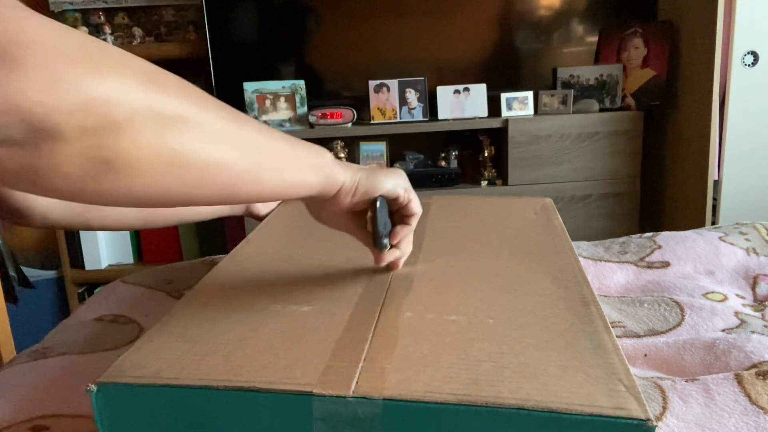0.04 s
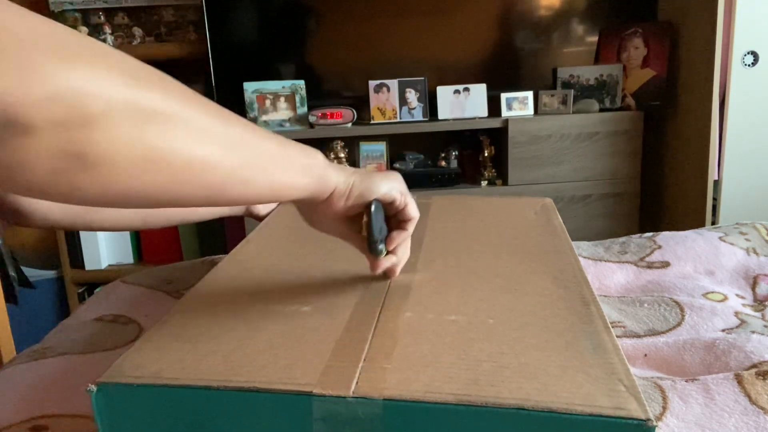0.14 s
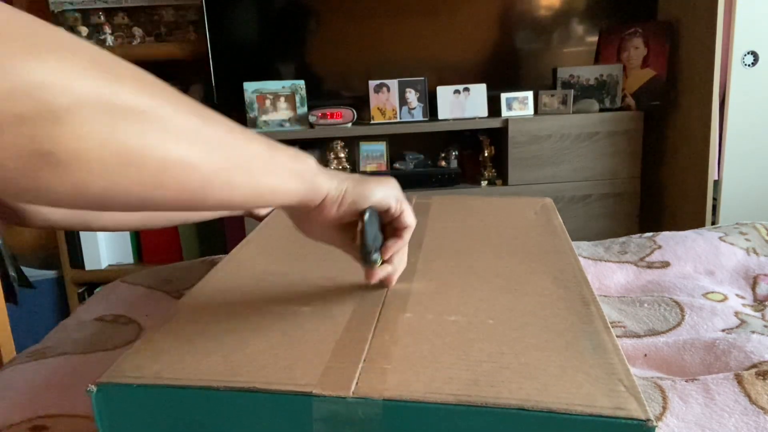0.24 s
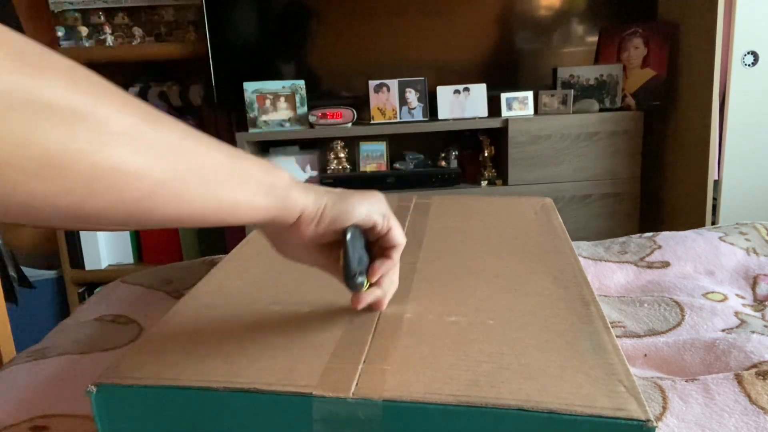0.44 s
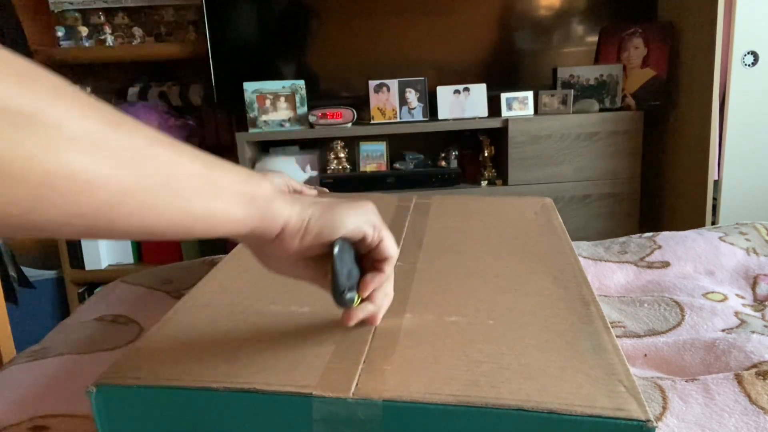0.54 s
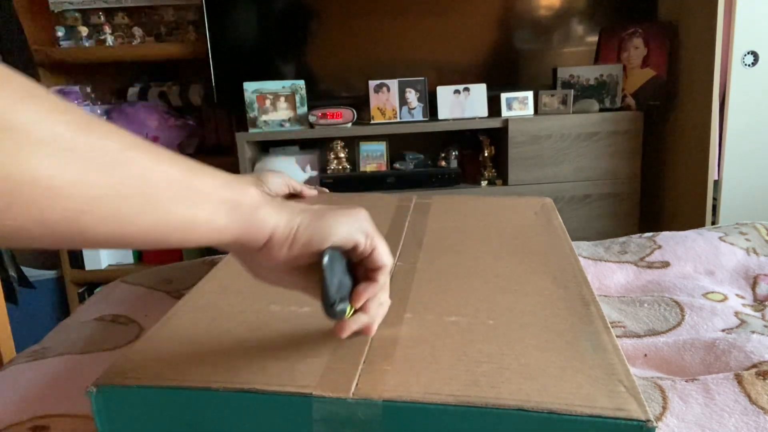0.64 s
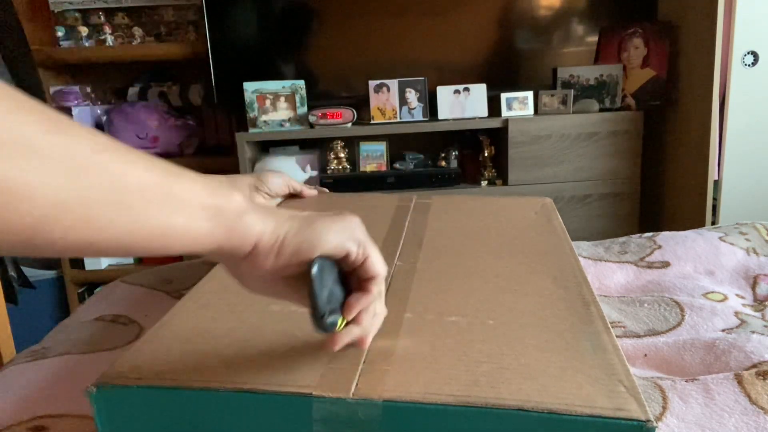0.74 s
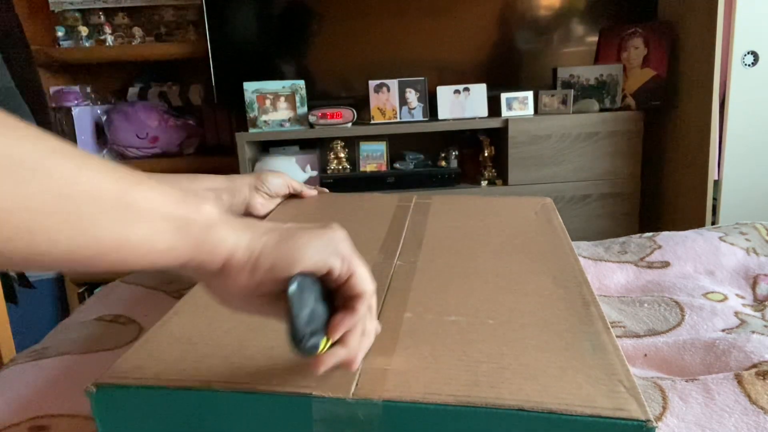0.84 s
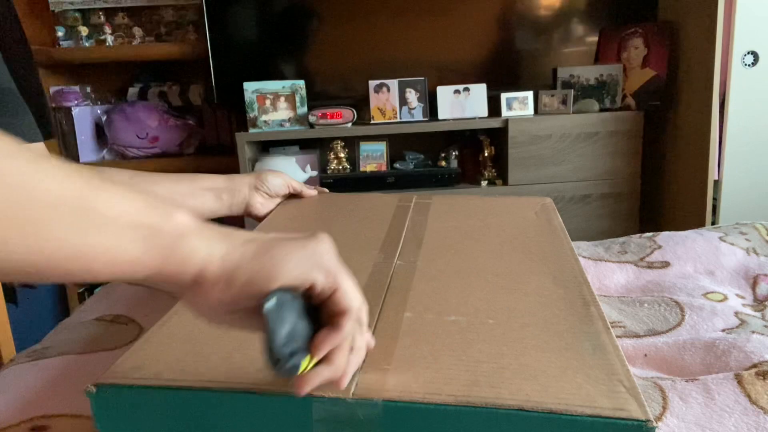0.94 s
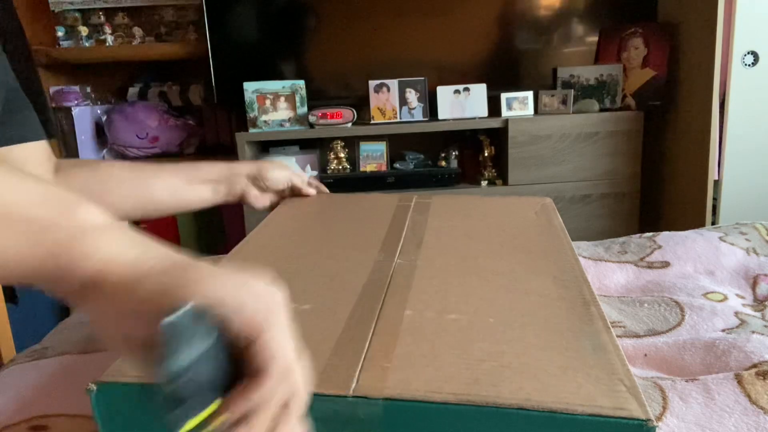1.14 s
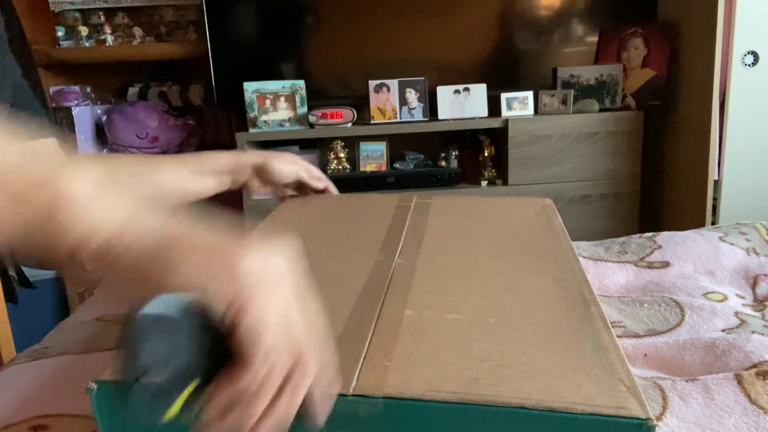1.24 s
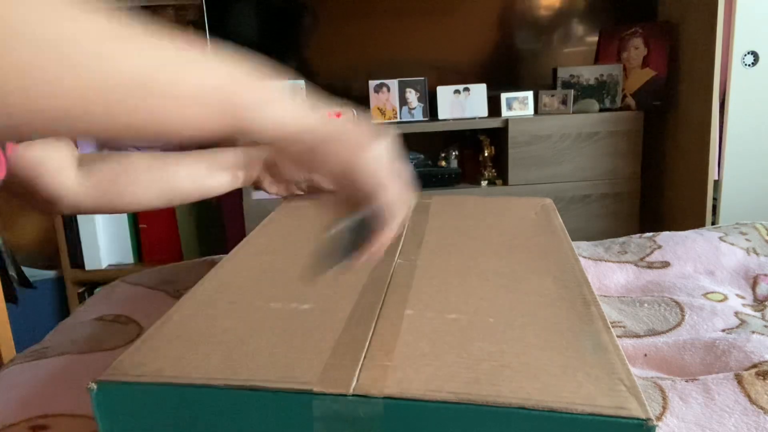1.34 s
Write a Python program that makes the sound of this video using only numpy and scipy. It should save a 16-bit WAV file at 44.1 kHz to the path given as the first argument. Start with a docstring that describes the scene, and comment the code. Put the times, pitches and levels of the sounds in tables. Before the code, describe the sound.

A box cutter drags along the taped seam of a hollow cardboard box, rasping and booming steadily, then rips out at the edge with a crisp click and soft thump, heard close in a small quiet room.

```python
"""In a small, quiet room, a box cutter is drawn towards the listener along a cardboard box's taped seam.
Tiny slips of the blade ring the lid's modes as a rasp and make the hollow box boom. Noise shaped by spectra
gives tearing fibres and the hiss of parting tape, brighter near the front edge; cutter rings swell in turn.
There the blade rips free and judders, the front flap knocks, the box thumps and the blade clicks in its
holder. A faint rustle swells after the cut, over still room air in stereo."""
import sys
import numpy as np
from scipy import signal
from scipy.fft import rfft, irfft, next_fast_len
from scipy.io import wavfile
from scipy.ndimage import uniform_filter1d, map_coordinates

SR = 44100
rng = np.random.default_rng(int(sys.argv[2]) if len(sys.argv) > 2 else 0)


def dump_mix(stems):
    """Bounce the given channels to the path in sys.argv[1] as a 16-bit WAV at rate SR."""
    frames = np.atleast_2d(stems).T  # one column per channel
    limited = np.clip(frames, -1, 1)  # hard clip at full scale
    pcm = np.round(limited * 32767).astype(np.int16)
    wavfile.write(sys.argv[1], SR, pcm)


N = 61739
T = np.arange(N) / SR
SIDES = np.array([[1], [-1]])  # opposite signs in left and right


def from_db(db):
    """Turn decibels into amplitude gain."""
    return 10 ** (np.asarray(db) / 20)


def rms_one(x):
    """Scale to rms 1."""
    return x / np.sqrt(np.mean(x ** 2) + 1e-20)


def in_time(rows):
    """Draw a two-column curve at every sample, with straight lines between its points."""
    s, values = np.transpose(rows)
    return np.interp(T, s, values)


def pan(db):
    """Left and right gains; a positive level difference favours the left."""
    return from_db(db * SIDES / 2)


def filtered(x, order, hz, kind="low"):
    """Apply a Butterworth filter."""
    return signal.sosfilt(signal.butter(order, hz, kind, fs=SR, output="sos"), x)


def ring(force, hz, t60):
    """A resonance driven by a force: a unit click starts a decaying sine of height about 1."""
    radius = from_db(-60 / (t60 * SR))
    w = 2 * np.pi * hz / SR
    return signal.lfilter([0, np.sin(w)], [1, -2 * radius * np.cos(w), radius ** 2], force + 1e-18)


def ring_modes(force, modes):
    """Ring a body's modes together with one force."""
    return sum(from_db(db) * ring(force, hz, t60) for hz, db, t60 in modes)


def push(s, length):
    """A smooth press and release of the board: one sine cycle of unit total size."""
    force = np.sin(2 * np.pi * np.clip((T - s) / length, 0, 1))
    return force / (np.abs(force).sum() + 1e-12)


def slips(per_s=2500, spread_db=3.0):
    """Friction as dense random slips of uneven size and either sign; rms 1."""
    sizes = from_db(spread_db * np.minimum(rng.exponential(1, N), 4))
    sizes = sizes * rng.choice([-1, 1], N)
    return rms_one(sizes * (rng.random(N) < per_s / SR))


def grit():
    """Slips mixed with smooth noise; rms 1."""
    return rms_one(slips() + rng.standard_normal(N))


def burst(s, db, attack, t60):
    """An envelope that rises quickly and dies away."""
    age = np.maximum(T - s, 0)
    return np.minimum(age / attack, 1) * from_db(db - 60 * age / t60)


def coloured(direct, spectrum, width):
    """Add diffuse sound at the sides to a central signal, then shape both by a spectrum; rms 1."""
    hz, db = np.transpose(spectrum)
    size = next_fast_len(N)
    bins_hz = np.arange(size // 2 + 1) * SR / size
    gain = from_db(np.interp(np.log(bins_hz + 1), np.log(hz), db))
    gain = gain * (1 - np.exp(-(bins_hz / (hz[0] / 2)) ** 2))  # fade out below the first point
    pair = direct + width * rng.standard_normal(N) * SIDES
    return rms_one(irfft(rfft(pair, size) * gain, size)[:, :N])


def room(x, wet_db):
    """The small room's reflections as a short decaying noise tail, different in each ear."""
    t60_s, delay_s, cut_hz = 0.19, 0.0015, 7600
    t = T[:N // 2]
    tail = rng.standard_normal((2, len(t))) * from_db(-60 * t / t60_s) * (t > delay_s)
    tail = filtered(tail, 2, cut_hz)
    tail /= np.sqrt(np.sum(tail ** 2, axis=1, keepdims=True) * SR / (2 * cut_hz))
    x = x * np.ones((2, 1))
    reflections = signal.fftconvolve(x.mean(axis=0)[None], tail, axes=1)[:, :N]
    return x + from_db(wet_db) * reflections


def steadied(x):
    """Even out the level over about 20 ms, so that the sound stays steady."""
    return x / np.sqrt(uniform_filter1d(np.mean(x * x, axis=0), size=900) + 1e-12)


# still air in the room: pitch_hz, relative level_db per Hz
AIR_SPECTRUM = [(30, -4), (65, 9.5), (130, -2), (400, -8.5), (1000, -1), (2000, -13.5), (5000, -34.5),
                (9000, -34), (13000, -27), (15500, -36)]


def room_air():
    """Wide, steady noise of the still room."""
    return from_db(-67.5) * coloured(rng.standard_normal(N), AIR_SPECTRUM, width=0.71)


# colour of the rustle: pitch_hz, relative level_db per Hz
RUSTLE_SPECTRUM = [(100, 3), (400, -7.5), (1000, -10.5), (4300, -3.5), (7000, -5), (9300, -16),
                   (12000, -3.5), (15000, -17)]
# rustle as the arm moves: time_s, level_db
RUSTLE_LEVEL = [(0, -74), (1.1, -62.5), (1.2, -59), (1.235, -69), (1.265, -69.5), (1.282, -57),
                (1.33, -62.5), (1.4, -72)]


def rustle():
    """Faint wide noise that swells as the arm moves after the cut."""
    noise = coloured(rng.standard_normal(N), RUSTLE_SPECTRUM, width=0.71)
    return from_db(in_time(RUSTLE_LEVEL)) * noise


# the blade catches and the rasp surges or stalls: peak_s, change_db
CATCHES = [(0.24, 3.5), (0.251, 4.5), (.268, -3), (0.2755, 7), (0.311, 3), (.363, -1.5), (0.608, 8.5),
           (.644, 4), (0.674, 6.5), (0.7, 3), (0.791, 3.5), (0.814, 1.5), (0.976, 6)]


def surges():
    """Swings of the drag in dB: marked catches over a small random unevenness."""
    catch_s, uneven_db, uneven_per_s = 0.0058, 1.5, 30
    knots = np.arange(0, T[-1] + 1, 1 / (2 * uneven_per_s))
    uneven = np.interp(T, knots, rng.standard_normal(len(knots)))
    catches = sum(db * np.exp(-((T - s) / catch_s) ** 2) for s, db in CATCHES)
    return uneven_db * uneven + catches


# rasp of the lid, before its trim and the surges: time_s, level_db
RASP_LEVEL = [(0, -55), (.13, -56), (.19, -57.5), (.232, -51), (.24, -41.5), (.33, -41.5), (.45, -41),
              (.59, -43.5), (.72, -42.5), (.77, -39), (.89, -38.5), (.97, -43), (1.01, -45.5), (1.05, -48),
              (1.066, -42), (1.09, -63), (1.11, -80), (1.2, -81.5)]
# pitch favoured by the blade's place on the lid: time_s, pitch_hz
LID_FOCUS = [(.1, 523), (.27, 567), (.4, 820), (.68, 745), (.8, 640), (.88, 527), (.97, 497), (1.05, 331)]
# modes of the lid: pitch_hz, relative level_db, t60_s
LID_MODES = [(290, -3, 0.12), (385.4, 2.5, 0.05), (440, -3, 0.031), (515, -5, 0.12), (583.6, -3.5, 0.086),
             (675, -5, 0.053), (756.4, -3, 0.082), (805.5, -5, 0.11), (892.5, -4, .12), (946, -2, 0.068),
             (1048, -4, 0.018), (1230, -7.5, 0.019), (1423, -9, 0.045)]


def lid_rasp(surge):
    """Slips ring the lid while the blade's place favours some of its modes."""
    trim_db, focus_db, focus_octaves = -0.5, 8, 0.41
    side_share = 0.3  # slips that differ between the ears
    focus_hz = in_time(LID_FOCUS)
    drag, rasp = slips(), 0
    for k, (hz, db, t60) in enumerate(LID_MODES):
        near = np.exp(-(np.log2(hz / focus_hz) / focus_octaves) ** 2)
        force = 0.5 * drag + slips() + side_share * slips() * SIDES
        mode = rms_one(ring(np.diff(force, prepend=0), hz, t60))
        rasp = rasp + from_db(db + focus_db * near) * mode * (-1) ** k
    rasp = filtered(rasp, 2, [220, 1700], "band")
    return from_db(in_time(RASP_LEVEL) + surge + trim_db) * steadied(rasp)


# soft blows on the cardboard: start_s, box_level_db, lid_level_db, contact_s
BUMPS = [(0.2114, -57, -49, 0.0011), (0.2207, -31.5, -68, 0.0068), (0.2283, -35.5, -63, 0.0059),
         (1.0805, -27.5, -59.5, 0.0084), (1.349, -75, -58, 0.0042), (1.383, -48.5, -65, 0.014)]


def lid(surge):
    """The lid rasps under the drag and knocks when soft blows press it, with the room around it."""
    blows = sum(from_db(db) * push(s, length) for s, _, db, length in BUMPS)
    knock = ring_modes(blows, LID_MODES)
    return room(lid_rasp(surge) + knock, wet_db=-9) * pan(-1.25)


# boom of the box, before its trim and the surges: time_s, level_db
BOOM_LEVEL = [(0, -49.5), (.12, -53), (.2, -56), (.25, -50), (.32, -46.5), (.43, -44), (.65, -43.5),
              (.71, -47.5), (.85, -46), (.98, -42), (1.05, -44.5), (1.1, -46.5), (1.15, -69), (1.22, -85)]
# modes of the whole box and its air: pitch_hz, relative level_db, t60_s
BOX_MODES = [(65, -6.5, 0.11), (107, -4, 0.13), (155.4, -4, .07), (185.5, 0, 0.054), (239, -6.5, 0.025)]


def box(surge):
    """Slips make the hollow box boom, and the same soft blows as on the lid make it thump."""
    trim_db, boom = -1, 0
    for hz, db, t60 in BOX_MODES:
        boom = boom + from_db(db) * rms_one(ring(np.diff(slips(), prepend=0), hz, t60))
    boom = steadied(filtered(boom, 2, 320)[None])
    boom = from_db(in_time(BOOM_LEVEL) + surge + trim_db) * boom
    blows = sum(from_db(db) * push(s, length) for s, db, _, length in BUMPS)
    thump = ring_modes(blows, BOX_MODES)
    return room(boom - thump, wet_db=-16) * pan(1.2)


# narrow rings of the cutter: pitch_hz, relative level_db, t60_s, strongest_s
CUTTER_RINGS = [(2098, 7, 0.15, 0.35), (2274, 0, 0.087, 0.76), (2685, 6, 0.033, .52),
                (3080, -1, 0.096, 0.61), (3620, 4, .08, 0.83)]


def cutter_rings():
    """Slips ring the dragged cutter, whose narrow tones swell in turn; rms 1."""
    swell_db, swell_s = 4.5, 0.09
    rings = 0
    for hz, db, t60, s in CUTTER_RINGS:
        swell = swell_db * np.exp(-((T - s) / swell_s) ** 2)
        rings = rings + from_db(db + swell) * rms_one(ring(slips(), hz, t60))
    return rms_one(rings)


# tearing fibres, before their trim and the surges: time_s, level_db
TEAR_LEVEL = [(0, -67), (.12, -59), (.19, -63.5), (.228, -59.5), (.245, -52.5), (.28, -53), (.4, -46),
              (.46, -50.5), (.56, -52.5), (.63, -54.5), (.8, -52.5), (.97, -47), (1.0, -57), (1.04, -57),
              (1.07, -46.5), (1.12, -60.5), (1.2, -94)]
# colour of the tearing: pitch_hz, relative level_db per Hz
TEAR_SPECTRUM = [(900, -5.5), (1300, 1), (1700, -0.5), (2150, -4), (2700, -4.5), (3500, -12.5), (5000, -44)]


def tearing(surge):
    """Fibres give way as sparser slips, mixed with the cutter's rings; both follow the drag a little."""
    trim_db, rings_db, follow = -1, -6.5, 0.21
    fibres = coloured(slips(per_s=900, spread_db=1.5), TEAR_SPECTRUM, width=0.51)
    level = from_db(in_time(TEAR_LEVEL) + follow * surge + trim_db)
    return level * (fibres + from_db(rings_db) * cutter_rings())


# hiss of the parting tape, before its trim: time_s, level_db
HISS_LEVEL = [(0, -64), (.19, -64), (.24, -57.5), (.55, -60), (.8, -59), (.88, -52.5), (.97, -46.5),
              (1.0, -51.5), (1.05, -49), (1.08, -57.5), (1.18, -64), (1.23, -85)]
# colour of the tape's film: pitch_hz, relative level_db per Hz
FILM_SPECTRUM = [(2000, -8), (3200, -2), (4400, 0), (6200, 1), (8000, 2), (9300, -37.5), (10500, 0.5),
                 (11800, -4), (13500, -3.5), (14800, -35)]


def tape_hiss():
    """The parting film hisses as slips and noise in the treble."""
    trim_db = 3.5
    return from_db(in_time(HISS_LEVEL) + trim_db) * coloured(grit(), FILM_SPECTRUM, width=0.67)


# scratches through the film, as the blade bites and before it rips free: start_s, level_db, attack_s, t60_s
SCRATCHES = [(.098, -55.5, .004, 0.16), (.211, -53, .002, 0.049), (.224, -47, 0.0088, .12),
             (1.0505, -42, 0.0035, 0.057)]


def scratches():
    """The blade scratches the film in short bursts of coarse grains."""
    grains = coloured(slips(per_s=640), FILM_SPECTRUM, width=0.51)
    return sum(burst(*row) for row in SCRATCHES) * grains


def tape(surge):
    """Tearing, hiss and scratches share the place of the tape."""
    return (tearing(surge) + tape_hiss() + scratches()) * pan(0.5)


# the blade clicks and chatters in its holder: start_s, level_db
CLICKS = [(1.0909, -12.5), (1.0944, -28), (1.0990, -34)]
FIRST_CLICK_S, CLICK_CONTACT_S = CLICKS[0][0], 0.00042
# colour of the rip: pitch_hz, relative level_db per Hz
RIP_SPECTRUM = [(700, -12), (1500, -2), (2400, -10.5), (3500, 2.5), (4900, 1.5), (6000, 7.5), (7200, -1),
                (9300, -9), (11500, -2.5), (15000, -14)]


def rip():
    """Gritty noise bursts as the blade rips through the edge, then a crack around the first click."""
    ripping = burst(1.056, db=-25, attack=0.0029, t60=0.056)
    crack = burst(FIRST_CLICK_S - CLICK_CONTACT_S, db=-21.5, attack=CLICK_CONTACT_S, t60=0.032)
    return (ripping + crack) * coloured(grit(), RIP_SPECTRUM, width=0.695)


# the blade judders over the last fibres: start_s, level_db, strongest pitch_hz
JUDDERS = [(1.0585, -28.5, 6200), (1.0601, -28.5, 5980), (1.0625, -32.5, 5500), (1.0624, -31.5, 4540),
           (1.0652, -29, 3770), (1.0667, -44, 4000), (1.0735, -37.5, 4020)]
# modes of the blade while the board still grips it: pitch_hz, relative level_db, t60_s
GRIPPED_MODES = [(2995, -7.5, 0.053), (3550, -8.5, 0.033), (4130, 0, 0.019), (4800, -3, .02),
                 (5840, 3, 0.013), (6320, -4.5, .012), (11500, -11, .003)]


def judder():
    """Each contact strikes the gripped blade's modes, favouring those near its own pitch."""
    spread_db, focus_octaves, off_db = 1.5, 0.43, 9.5
    s, strength_db, centre_hz = np.transpose(JUDDERS)
    out = 0
    for hz, mode_db, t60 in GRIPPED_MODES:
        off = 1 - np.exp(-(np.log2(hz / centre_hz) / focus_octaves) ** 2)
        uneven_db = rng.normal(0, spread_db, len(s))
        hits = np.zeros(N)
        hits[(s * SR).astype(int)] = from_db(strength_db + mode_db - off_db * off + uneven_db)
        out = out + ring(hits, hz, t60)
    return filtered(out, 2, 2500, "high")


# the freed flap knocks against the front wall: start_s, level_db, contact_s
FLAP_KNOCKS = [(1.0589, -34.5, 0.0013), (1.0649, -31, .0023), (1.0774, -33, 0.0032),
               (1.0838, -38.5, 0.0018)]
# modes of the flap: pitch_hz, relative level_db, t60_s
FLAP_MODES = [(209, -21.5, 0.082), (326, -12.5, 0.045), (421, 2.5, 0.053), (481, -3.5, 0.065),
              (548, -8.5, 0.028), (927, -3, .05)]


def flap():
    """The front flap comes free and its knocks ring a firm, hollow note."""
    blows = sum(from_db(db) * push(s, length) for s, db, length in FLAP_KNOCKS)
    return room(ring_modes(blows, FLAP_MODES), wet_db=-17)


# modes of the blade in its holder: pitch_hz, relative level_db, t60_s
HOLDER_MODES = [(1943, -18, 0.012), (3060, -28, 0.12), (4200, 2.5, 0.0092), (4520, 0, 0.0091),
                (5500, -12.5, 0.0064), (6240, -3.5, 0.015), (6200, -40.5, 0.26), (4544, -55, 0.3),
                (6800, -19, 0.023), (11340, -7, 0.004)]


def holder_clicks():
    """The freed blade strikes its holder, which rings its modes and gives one very short snap."""
    snap_db, snap_hz, snap_width_s = -3, 5250, 0.00024
    hits = sum(from_db(db) * (np.arange(N) == int(s * SR)) for s, db in CLICKS)
    ringing = 0
    for k, (hz, db, t60) in enumerate(HOLDER_MODES):
        ringing = ringing + from_db(db) * ring(hits, hz, t60) * (-1) ** k
    since = T - FIRST_CLICK_S
    fade_in = np.clip(since / CLICK_CONTACT_S, 0, 1)
    snap = np.exp(-((since - CLICK_CONTACT_S) / snap_width_s) ** 2)
    snap = from_db(snap_db) * snap * np.sin(2 * np.pi * snap_hz * since)
    return ringing * fade_in + snap


def blade():
    """Rip, judder and clicks sound from the blade, with the room around it."""
    return room(rip() + judder() + holder_clicks(), wet_db=-10) * pan(1.5)


# the cut lies a little to the right, so the left ear hears it later: time_s, lag_ms
EAR_LAG = [(0, 0.098), (.8, 0.068), (.97, 0.081), (1.09, 0.021)]


def from_blade(x):
    """Delay the left ear according to where the blade is."""
    heard_s = T - in_time(EAR_LAG) / 1000
    left = map_coordinates(x[0], [heard_s * SR], order=3, mode="nearest")
    return np.array([left, x[1]])


def scene():
    """The cut, the box and the room."""
    surge = surges()
    background = room_air() + rustle()
    cut = lid(surge) + box(surge) + tape(surge) + blade() + flap()
    return from_blade(cut) + background


def record(dry):
    """The sound loses the deepest bass, has a narrow gap near 9 kHz and rolls off; the top is cut steeply."""
    gap_hz, gap_width_hz = 9100, 1800
    dry = filtered(dry, 2, 53, "high")
    dry = signal.lfilter(*signal.iirnotch(gap_hz, gap_hz / gap_width_hz, fs=SR), dry)
    dry = filtered(dry, 10, 14400)
    return signal.sosfilt(signal.cheby2(12, 70, 16300, fs=SR, output="sos"), dry)


dry = scene()
out = record(dry)
dump_mix(out)
```